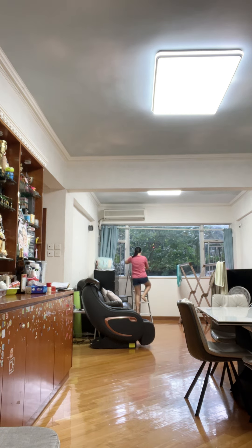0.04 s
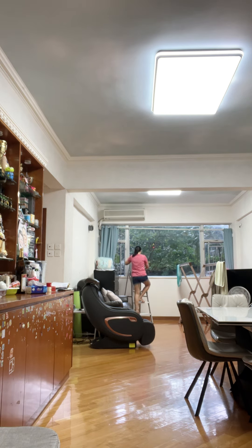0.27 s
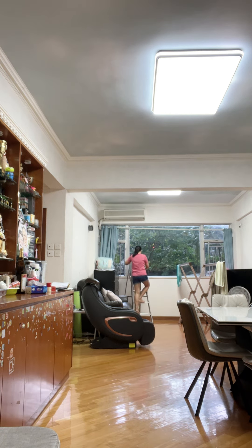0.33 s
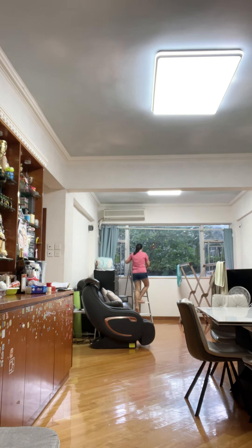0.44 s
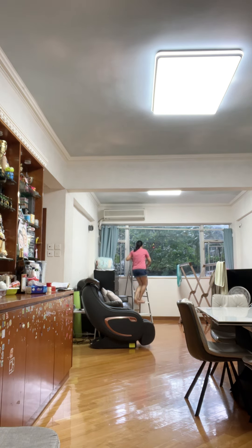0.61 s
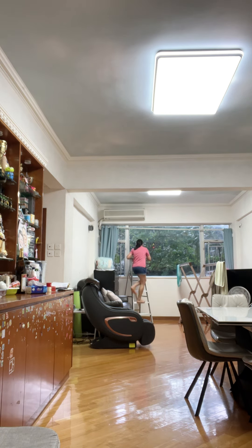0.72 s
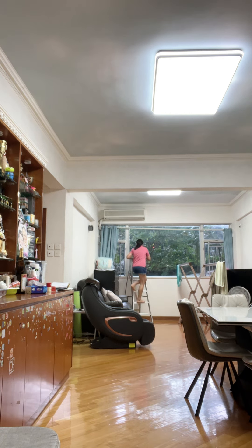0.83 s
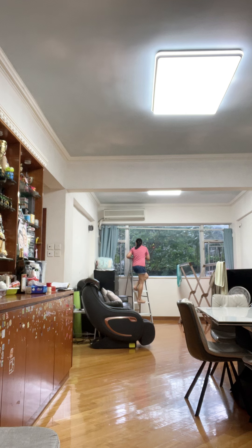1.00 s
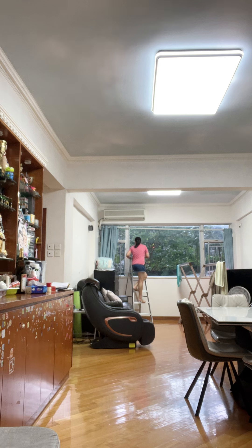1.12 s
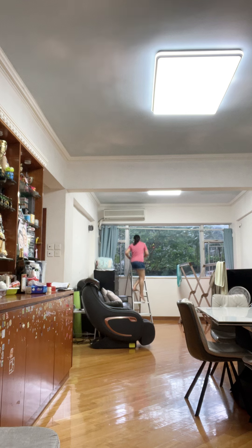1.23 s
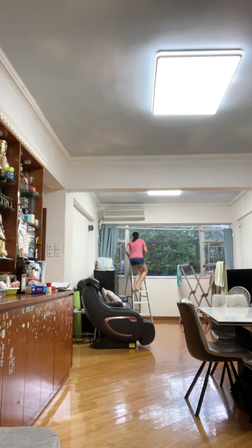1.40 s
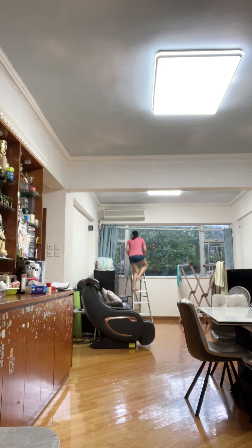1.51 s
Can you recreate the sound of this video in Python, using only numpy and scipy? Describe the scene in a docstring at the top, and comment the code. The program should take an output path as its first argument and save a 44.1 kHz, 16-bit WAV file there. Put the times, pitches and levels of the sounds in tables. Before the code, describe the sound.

A metal stepladder rattles loudly under a climber's step, then knocks more lightly and clinks as feet softly thump and scuff the treads. The microphone sits across the living room, picking up echo and a faint steady hum.

```python
"""Metal knocks and rattles as someone climbs a stepladder, across a bare living room from the microphone.
Each shift of weight knocks the loose joints, which chatter and ring the tubular frame. Slipping parts
ping, a hinge clinks, and feet thump and scuff on the treads. At this distance most of the clatter
reaches the single microphone as reverberation, over a low steady hum."""
import sys
import numpy as np
from scipy import signal
from scipy.fft import rfft, irfft
from scipy.io import wavfile
from scipy.ndimage import uniform_filter1d

SR = 44100
rng = np.random.default_rng(int(sys.argv[2]) if len(sys.argv) > 2 else 0)


def bounce(signal):
    """Save signal as a 16-bit WAV file at the path given by the first command-line argument."""
    frames = np.transpose(np.atleast_2d(signal))
    limited = np.clip(frames, -1, 1)
    pcm = np.round(limited * 32767).astype(np.int16)
    wavfile.write(sys.argv[1], SR, pcm)


N = 68355
T = np.arange(N) / SR
FREQS = np.maximum(np.fft.rfftfreq(2 * N, 1 / SR), 1)

# knocks of treads and joints: start_s, relative_level_db, chatter_s, body_db, edge_db, sizzle_db
KNOCKS = [(0.0, -19.5, 0.012, 1, -3, 8.5), (0.205, -14.5, 0.011, -2, 6, 1), (0.213, -12, 0.0097, 1, 2.5, 4),
          (0.226, -13, 0.0084, 6, 10, 16), (0.266, -5.5, 0.012, 6, 3.5, -17),
          (0.273, -0.5, 0.0057, -1, -3.5, -3), (0.283, 0, 0.0084, -0.5, -7, -32),
          (0.309, -1.5, 0.0067, 0, -14, 1.5), (0.353, -4, 0.01, -6.5, 7, 6),
          (0.367, -8, 0.0056, -6, -4, -2), (0.385, -10.5, .025, 5.5, 5.5, 10),
          (0.424, -9.5, 0.058, -1.5, 3, 17), (0.506, -24, 0.024, -10, 5, 12),
          (0.822, -19.5, 0.046, 5.5, -9, -4), (0.882, -17.5, 0.036, 4, 2.5, 5),
          (0.898, -13, 0.019, -9, -8, 1), (0.938, -15.5, 0.02, 1, 6, 2),
          (0.946, -10.5, 0.0088, 3.5, 5.5, 0.5), (0.962, -14.5, .025, 3, -3, -8),
          (1.000, -13.5, 0.028, 7.5, 4.5, 9), (1.028, -16, 0.012, 4, 6, 0),
          (1.186, -33.5, 0.044, 19, 11, 18), (1.207, -14, 0.0066, 1.5, 2.5, 1),
          (1.227, -24, 0.012, 6.5, -18, 0), (1.300, -23.5, 0.069, 9.5, 7, 7),
          (1.385, -27, .04, 6.5, 12.5, 20), (1.46, -27, .04, -9, 5.5, 3)]
# spectrum of metal striking metal: frequency_hz, gain_db
CLACK_SPECTRUM = [(100, -23.5), (270, -14.5), (450, -2.5), (650, -2), (850, -2), (1400, 1), (1900, -1),
                  (2600, -3), (3300, -4), (4200, -7), (6500, -16), (9000, -31), (11000, -42), (13500, -38),
                  (16000, -50)]
# modes of the tubular frame: pitch_hz, gain_db, t60_s
FRAME_MODES = [(604, -6, .4), (640, -3, .4), (703, 2, .5), (1008, -4, .4), (1080, -5, .45), (1312, -4, .5),
               (1352, -2, .65), (1453, -4, .65), (1503, -5, .6), (1807, -4, .65), (2228, -6, .5),
               (2473, -7, .45), (2626, -8, .5), (3215, -8, .55)]
# ladder parts slipping: start_s, pitch_hz, level_db, decay_s
PINGS = [(0.209, 651, -39, .025), (0.211, 2030, -38, 0.038), (0.276, 2796, -28.5, 0.019),
         (0.285, 2263, -31, 0.023), (0.289, 702, -30.5, 0.024), (0.894, 1586, -42, 0.019),
         (0.949, 3690, -39.5, 0.013), (0.970, 4100, -40.5, 0.017), (1.208, 4520, -39.5, 0.0087),
         (1.226, 655, -39, 0.011), (1.227, 1625, -44, 0.017), (1.305, 671, -46, .025)]
# the hinge taking the load: start_s, level_db
CLINKS = [(1.208, -44), (1.232, -51.5), (1.262, -53.5)]
# modes of the small steel hinge: pitch_hz, gain_db, t60_s
HINGE_MODES = [(2530, -8, .3), (3160, -8, 0.42), (4200, -3, 0.27), (4545, -2, 0.23), (4500, -1, 0.15),
               (5125, -5.5, 0.11), (5400, -7, 0.16), (6040, -10.5, .28), (6910, -14, .3), (7690, -13, 0.24)]
# footfalls on the treads: start_s, level_db
THUMPS = [(0.269, -54), (0.35, -51), (0.43, -47), (0.675, -51), (0.954, -48.5), (1.005, -46.5),
          (1.066, -45.5), (1.13, -52.5), (1.198, -51.5), (1.252, -47), (1.379, -50)]
# modes of the wooden floor: pitch_hz, gain_db, t60_s
FLOOR_MODES = [(36, -7, .3), (62.4, -5.5, 0.48), (89.6, -2.5, 0.37), (107.4, -1.5, 0.2), (158.5, -5, 0.5),
               (271.5, -7.5, 0.24), (414.8, -5, 0.5)]
# soles and clothes brushing the treads: peak_s, level_db, rise_s, fall_s
SCUFFS = [(0.44, -49, 0.049, 0.0062), (0.66, -55, 0.17, 0.064), (1.21, -53.5, 0.032, 0.022),
          (1.41, -63.5, 0.081, 0.094)]
# spectrum of that friction: frequency_hz, gain_db
SCUFF_SPECTRUM = [(300, -17), (1500, -16), (4500, 6), (6500, 2.5), (8500, -6.5), (11000, -14), (13500, -8),
                  (16000, -15)]
# reverberation of the bare room: frequency_hz, t60_s
ROOM_T60 = [(100, 0.82), (600, 0.61), (1500, 0.65), (4000, 0.66), (8000, 0.48), (15000, 0.38)]
# room tone at the microphone: frequency_hz, gain_db
ROOM_TONE_SPECTRUM = [(20, -9), (40, -5.5), (62, 0), (100, 0.5), (150, -7.5), (210, -10.5), (310, -9),
                      (450, -13), (700, -17.5), (1500, -20.5), (4000, -25), (6500, -28.5), (10500, -44),
                      (13500, -40), (16000, -46)]
# partials of the mechanical hum: pitch_hz, level_db
HUM = [(64, -61), (99, -71), (151, -63), (299, -62)]

BODY_HZ, MIDDLE_HZ, EDGE_HZ, SIZZLE_HZ = 560, 1480, 5200, 9900  # where a knock's colour is set
CLACK_DB, CLACK_T60_S = 2, 0.011
CONTACT_S, CHATTER_PER_S, CHATTER_SHARE = 0.25, 500, 0.58
RING_DB, RING_RISE_S = -45, 0.01
PING_WAVER, PING_RISE_S, PING_ROOM_DB = 0.025, 0.0026, -9
DIRECT_DB, EARLY_DB, EARLY_T60_S, ROOM_BUILD_S = -7, -3, 0.24, 0.0023  # levels relative to the tail


def knocks(place_count=5):
    """Joints clack and set the frame ringing; each place on the ladder has its own path to the mic."""
    places, rings = np.zeros((place_count, N)), np.zeros(N)
    mode_hz, mode_db, _ = np.array(FRAME_MODES).T
    modes = np.array([fade(t60) * np.exp(2j * np.pi * hz * T) for hz, _, t60 in FRAME_MODES])
    modes *= attack(RING_RISE_S)
    for k, (start, db, chatter_s, body_db, edge_db, sizzle_db) in enumerate(KNOCKS):
        tone = [(BODY_HZ, body_db), (MIDDLE_HZ, 0), (EDGE_HZ, edge_db), (SIZZLE_HZ, sizzle_db)]
        clack = conv(joint_chatter(chatter_s), colour(tone, size=512))
        places[k % place_count] += undb(db) * at(clack, start)
        phases = np.exp(2j * np.pi * rng.random(len(FRAME_MODES)))
        struck = undb(mode_db + over_hz(tone, mode_hz)) * phases
        rings += undb(db) * at((struck @ modes).imag, start)
    at_mic = sum(conv(place, room()) for place in places)
    clacks = conv(at_mic, unit(colour(CLACK_SPECTRUM, size=2048)))
    return undb(CLACK_DB) * clacks + undb(RING_DB) * rings


def joint_chatter(chatter_s):
    """One blow and the dying bounces of the loose joint, each smeared along the tubes."""
    t = T[:int(CONTACT_S * SR)]
    hits = rng.random(len(t)) < CHATTER_PER_S / SR
    bounces = hits * rng.choice([-1, 1], len(t)) * np.exp(-t / chatter_s)
    smear = flatten(rng.standard_normal(len(t)) * fade(CLACK_T60_S)[:len(t)], size=40)
    blows = np.sqrt(1 - CHATTER_SHARE) * (t == 0) + np.sqrt(CHATTER_SHARE) * unit(bounces)
    return flatten(conv(blows, smear)[:len(t)], size=70)


def pings():
    """A joint slips and sings for an instant at a wavering pitch."""
    out = 0
    for start, hz, db, decay_s in PINGS:
        pitch = hz * (1 + PING_WAVER * noise([(250, 0), (1000, -37)]))
        envelope = attack(PING_RISE_S) * np.exp(-T / decay_s)
        out = out + undb(db) * at(np.sin(2 * np.pi * np.cumsum(pitch) / SR) * envelope, start)
    return out


def hinge():
    """The steel hinge clinks brightly as it takes the load."""
    return sum(undb(db) * at(ring(HINGE_MODES) * attack(PING_RISE_S), start) for start, db in CLINKS)


def footfalls(rise_s=0.0033):
    """Soft steps boom through the ladder's legs into the wooden floor."""
    return sum(undb(db) * at(ring(FLOOR_MODES) * attack(rise_s), start) for start, db in THUMPS)


def scuffs():
    """Soles and clothes rub the treads in short swells of friction hiss."""
    swell = sum(undb(db) * np.exp(-((T - peak) / np.where(T < peak, rise, fall)) ** 2 / 2)
                for peak, db, rise, fall in SCUFFS)
    return swell * noise(SCUFF_SPECTRUM)


def room():
    """Path to the distant mic: weak direct sound, dense early reflections, a tail shorter in the treble."""
    spectrum = rfft(rng.standard_normal(N), 2 * N)
    tail = 0
    for hz, t60 in ROOM_T60:
        band = over_hz([(f, f == hz) for f, _ in ROOM_T60], FREQS)
        tail = tail + irfft(spectrum * band)[:N] * fade(t60)
    early = rng.standard_normal(N) * fade(EARLY_T60_S)
    walls = (unit(tail) + undb(EARLY_DB) * unit(early)) * attack(ROOM_BUILD_S)
    return flatten(walls + undb(DIRECT_DB) * (T == 0))


def room_tone(rumble_db=-51):
    """Low rumble of the living room, with a faint mechanical hum."""
    hum = sum(undb(db) * np.sqrt(2) * np.sin(2 * np.pi * (hz * T + rng.random())) for hz, db in HUM)
    return undb(rumble_db) * noise(ROOM_TONE_SPECTRUM) + hum


def ring(modes):
    """Damped modes, each at a random phase."""
    return sum(undb(db) * fade(t60) * np.sin(2 * np.pi * (hz * T + rng.random()))
               for hz, db, t60 in modes)


def noise(points):
    """Coloured noise, rms about one."""
    return conv(rng.standard_normal(N), unit(colour(points)))


def colour(points, size=N):
    """Minimum-phase response through (frequency_hz, gain_db) points."""
    hz = np.maximum(np.fft.rfftfreq(2 * size, 1 / SR), 1)
    cepstrum = irfft(np.log(undb(over_hz(points, hz))))
    cepstrum[1:size] *= 2
    cepstrum[size + 1:] = 0
    return irfft(np.exp(rfft(cepstrum)))[:size]


def flatten(x, size=900):
    """Even out a burst's broad spectrum, keeping its fine peaks and dips."""
    spectrum = rfft(x, 2 * len(x))
    broad_shape = np.sqrt(uniform_filter1d(abs(spectrum) ** 2, size) + 1e-12)
    return unit(irfft(spectrum / broad_shape)[:len(x)])


def over_hz(points, hz):
    """Read (frequency_hz, value) points on a log-frequency axis."""
    freqs, values = np.array(points, float).T
    return np.interp(np.log(hz), np.log(freqs), values)


def attack(rise_s):
    return 1 - np.exp(-T / rise_s)


def fade(t60):
    """Exponential decay, 60 dB down after t60 seconds."""
    return np.exp(-np.log(1000) * T / t60)


def at(x, start):
    """Place a sound at its start time."""
    return np.concatenate([np.zeros(max(int(start * SR), 0)), x, np.zeros(N)])[:N]


def conv(a, b):
    return signal.fftconvolve(a, b)[:N]


def unit(x):
    """Scale to an energy of one."""
    return x / np.sqrt(np.sum(x ** 2) + 1e-18)


def undb(db):
    return 10 ** (np.asarray(db) / 20)


def scene():
    """The ladder heard from the other end of the room, in mono."""
    slips = pings()
    reverberant = conv(scuffs() + undb(PING_ROOM_DB) * slips, room())
    return (knocks() + hinge() + slips + reverberant + footfalls() + room_tone())[None]


def record(dry):
    """The recorder cuts the top off the microphone signal steeply."""
    top_hz = 15700
    return signal.sosfilt(signal.ellip(10, .2, 70, top_hz, fs=SR, output="sos"), dry)


dry = scene()
out = record(dry)
bounce(out)
```